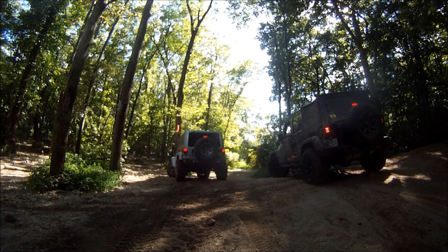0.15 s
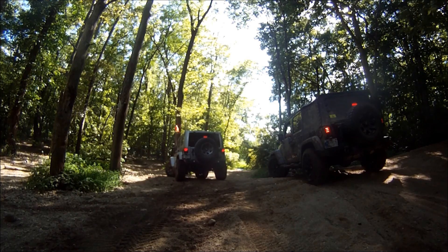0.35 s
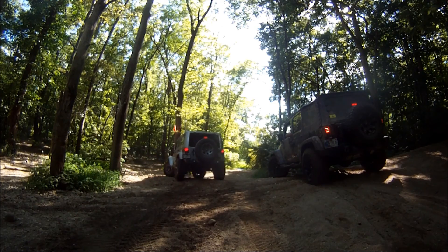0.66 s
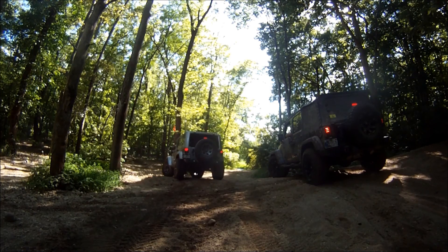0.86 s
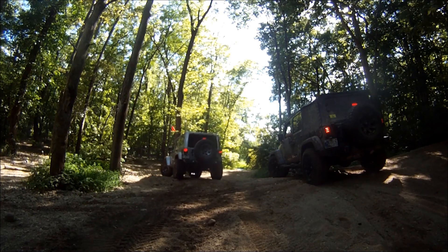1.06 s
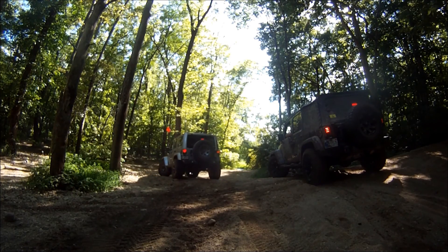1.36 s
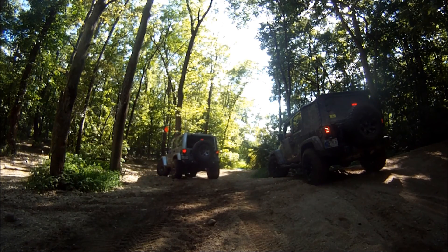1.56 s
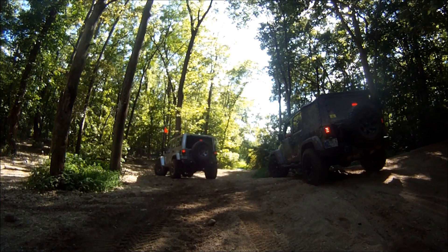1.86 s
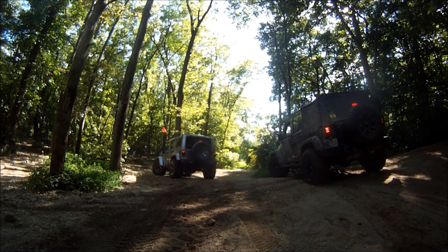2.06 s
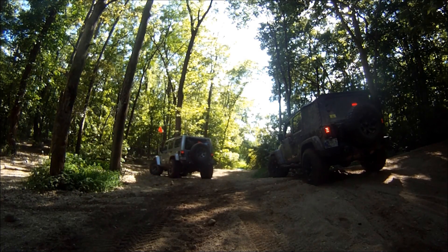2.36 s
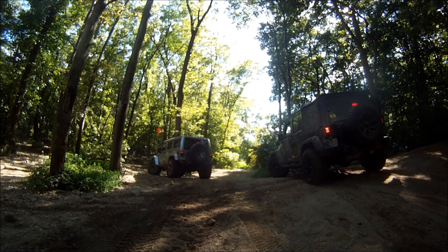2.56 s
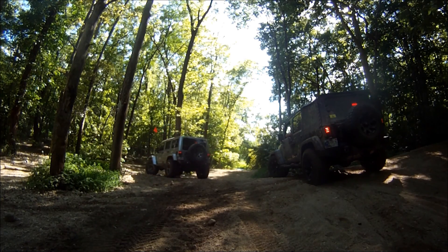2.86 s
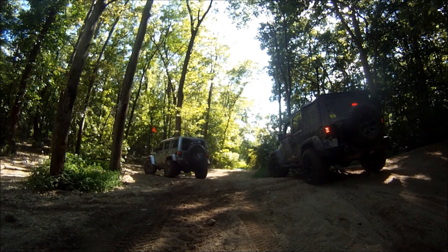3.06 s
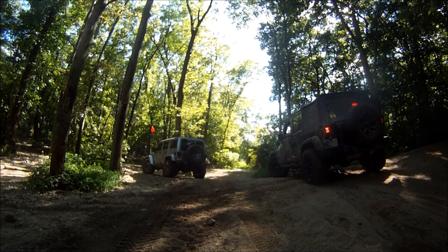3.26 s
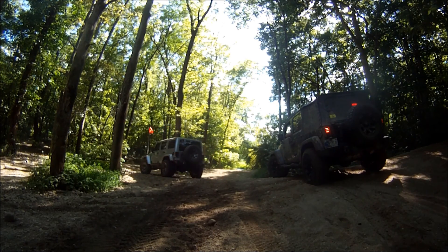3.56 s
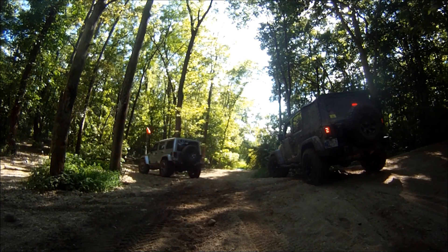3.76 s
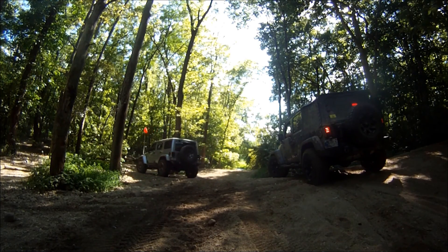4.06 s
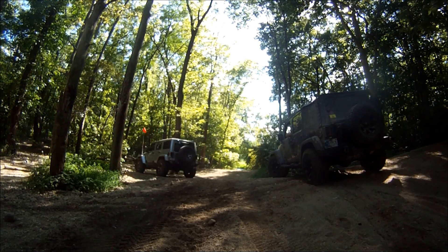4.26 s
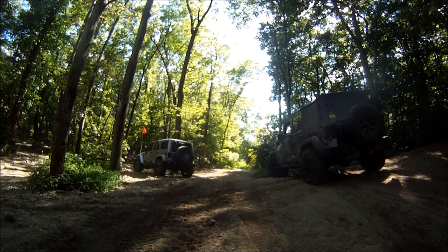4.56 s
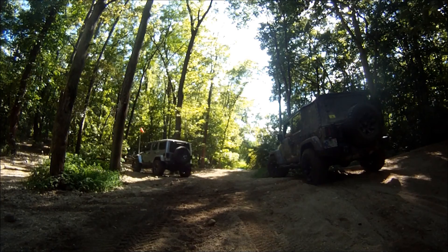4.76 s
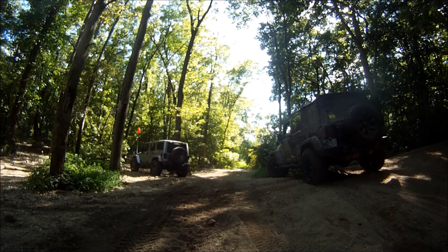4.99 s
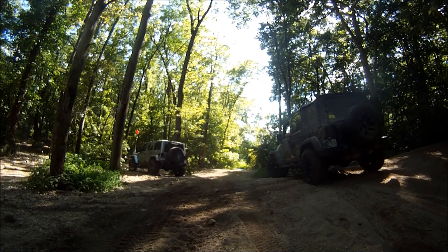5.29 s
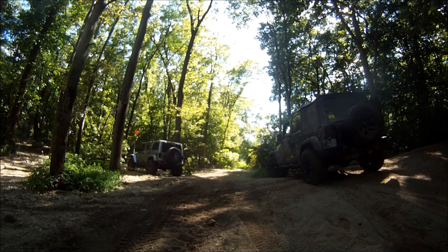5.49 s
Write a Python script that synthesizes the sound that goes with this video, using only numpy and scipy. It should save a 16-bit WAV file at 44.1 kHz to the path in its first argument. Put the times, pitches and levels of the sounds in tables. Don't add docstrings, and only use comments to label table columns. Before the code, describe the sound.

Close, muffled engine idle carried through the bodywork: deep hum, throbbing mid-range mechanical noise and a thin whine-like ring from the camera case. Fast little ticks run constantly with a coarse low-fidelity edge. Irregular low booms and soft thuds interrupt, strongest around 0.85, 3 and 3.65 seconds, with short clattering trim. No audible forest ambience.

```python
import sys
import numpy as np
from scipy import signal
from scipy.fft import rfft, irfft, next_fast_len
from scipy.io import wavfile
from scipy.ndimage import uniform_filter1d

SR = 44100
rng = np.random.default_rng(int(sys.argv[2]) if len(sys.argv) > 2 else 0)


def to_wav(sig):
    pcm = np.clip(np.atleast_2d(sig), -1, 1) * 32767
    pcm = np.round(pcm).astype(np.int16)
    wavfile.write(sys.argv[1], SR, pcm.T)


def voltage_ratio(decibels):
    exponent = np.asarray(decibels, float) / 20
    return 10 ** exponent


N = 248283
T = np.arange(N) / SR
CYLINDERS = 6
TICK_S = 0.00036


def walk(rate):
    hold = int(SR / rate)
    steps = np.repeat(rng.standard_normal(N // hold + 1), hold)
    return 1.315 * uniform_filter1d(uniform_filter1d(steps, hold), hold)[:N]


def curve(table):
    s, *columns = np.transpose(table)
    return [np.interp(T, s, column) for column in columns]


def coloured(gain_of_hz):
    size = next_fast_len(N)
    hz = np.arange(1, size // 2 + 2) * SR / size
    spectrum = rfft(rng.standard_normal(size)) * gain_of_hz(hz)
    return irfft(spectrum * np.sqrt(SR / 2), size)[:N]


def ringing(modes, steep, flicker_db):
    out = 0
    for mode_hz, width_hz, db in modes:
        band = coloured(lambda hz: voltage_ratio(db) / (1 + (2 * (hz - mode_hz) / width_hz) ** 2) ** steep)
        out = out + band * voltage_ratio(flicker_db * walk(8.3))
    return out


def clicks(s, db, hz, sharp_s):
    out = np.zeros(N + 500)
    t = np.arange(-100, 400)[:, None] / SR
    hit = np.exp(-(t / (sharp_s * np.where(t < 0, 1, 1.3))) ** 2)
    rough = np.cos(2 * np.pi * 0.06 * hz * t)
    after = voltage_ratio(-8.0) * (t > 0) * np.exp(-t / 0.0066) * rough
    click = voltage_ratio(db) * (hit + after) * np.sin(2 * np.pi * hz * t)
    places = ((s + TICK_S) * SR).astype(int) + np.arange(len(t))[:, None]
    np.add.at(out, places, click)
    return out[100:N + 100]


def crankshaft():
    firing_hz = 38.84 * (1 + 0.0011 * walk(1.5))
    return np.cumsum(firing_hz) / SR - 0.08


def panel_swing():
    # start_s, length_s, level_db, fade_db (over the swing)
    swings = [(0.02, 0.23, -30, -7), (0.24, 0.095, -28.5, -4), (0.362, .12, -32.5, -2.5),
              (0.837, 0.12, -19, -4), (0.959, 0.085, -24.5, -1), (1.046, 0.14, -31.5, 3),
              (1.223, 0.13, -28.5, -5), (1.362, 0.35, -33.5, -3), (1.742, 0.091, -29.5, -1.5),
              (1.85, 0.093, -30.5, 0.5), (1.949, 0.16, -31, -2), (2.176, 0.075, -33.5, 6.5),
              (2.365, .14, -34.5, -1.5), (2.569, 0.05, -29.5, 0), (2.675, 0.1, -29.5, -9),
              (2.788, .095, -30, 3.5), (2.968, .095, -20, 1), (3.032, 0.15, -23, -7.5),
              (3.19, 0.17, -34, 1.5), (3.412, 0.12, -33, -3), (3.628, 0.11, -22.5, 4),
              (3.743, 0.13, -34.5, 2.5), (3.903, 0.063, -31, 0.5), (3.982, .2, -32.5, -2.5),
              (4.255, 0.07, -28.5, -3), (4.341, 0.18, -32, -5.5), (4.495, 0.091, -22.5, 3),
              (4.598, 0.32, -27, -4), (5.24, 0.074, -33, 3), (5.394, 0.31, -38, 3.5)]
    attack_s, release_s, rest_db = 0.031, 0.033, -40
    power = voltage_ratio(2 * rest_db)
    for s, length, db, fade_db in swings:
        gate = np.clip(np.minimum((T - s) / attack_s, (s + length - T) / release_s), 0, 1)
        level = voltage_ratio(db + fade_db * np.clip((T - s) / length, 0, 1))
        power = power + (np.sin(np.pi / 2 * gate) ** 2 * level) ** 2
    return 10 * np.log10(power)


def engine_noise(crank, swing_db):
    # pitch_hz, width_hz, peak_db (per Hz)
    shell_modes = [(50.5, 3.4, -50.5), (77.7, 28, -60.5), (121.7, 8.1, -66), (145.5, 28, -66),
                   (157.6, 15.5, -66.5), (214.2, 12, -62.5), (235.6, 23.4, -59.5), (285, 37, -67),
                   (318.4, 21, -65.5), (340.5, 24, -69.5), (371.6, 25, -74)]
    # pitch_hz, width_hz, peak_db (per Hz)
    block_modes = [(510, 102, -82.5), (617, 76, -84), (785, 79, -76.5), (858, 53, -74), (910, 64, -81),
                   (977, 35, -82.5), (1079.7, 54, -67.5), (1141, 50, -68.5), (1230, 136, -70.5),
                   (1359, 41.4, -68.5), (1457, 25, -81.5)]
    # pitch_hz, width_hz, peak_db (per Hz)
    case_modes = [(1660, 45, -84), (1930, 60, -85.5), (2177, 246, -80.5), (2375, 150, -79.5),
                  (2517, 123, -83.5), (2690, 230, -84), (2804, 34, -70.5), (2859.6, 51.7, -68.5),
                  (3490, 510, -95), (3837, 380, -94), (4290, 270, -101)]
    # pitch_hz, level_db (per Hz)
    hiss_colour = [(18, -93), (40, -59), (182, -85), (300, -74.5), (450, -87.5), (1500, -88), (4600, -108),
                   (5650, -104)]
    # time_s, level_db
    effort = [
        (0, 1),
        (.9, -1),
        (1.5, 0),
        (3, 0),
        (3.45, -2),
        (3.65, 0),
        (4.9, 1),
        (5.63, 1),
    ]
    throb = np.cos(2 * np.pi * crank)
    hz, db = np.transpose(hiss_colour)
    hiss = coloured(lambda f: voltage_ratio(np.interp(np.log(f), np.log(hz), db) - (f > 6000) * 60))
    shell = voltage_ratio(0.73 * throb) * ringing(shell_modes, steep=1.15, flicker_db=0.5)
    block = voltage_ratio(0.28 * throb) * ringing(block_modes, steep=1.0, flicker_db=0.18)
    case = voltage_ratio(0.1 * throb) * ringing(case_modes, steep=1.055, flicker_db=-0.16)

    wander_per_s = 7
    block_db = curve(effort)[0] + 0.98 * walk(wander_per_s)
    shaking_db = np.maximum(swing_db + 26, 0)
    shell_db = 0.25 * shaking_db + 1.2 * walk(wander_per_s) - 0.6
    case_db = -0.28 * block_db + 0.12 * shaking_db + 0.3 * walk(wander_per_s)
    resonances = voltage_ratio(shell_db) * shell + voltage_ratio(block_db) * block + voltage_ratio(case_db) * case
    return resonances + voltage_ratio(0.79 * throb) * hiss


def injector_ticks(crank):
    open_db = [0, 1, -2, 1, -2, 1]
    close_db = [-8, -8, -7, -5, -8, -9]
    # time_s, level_db
    ticking = [
        (0.0, -69),
        (5.63, -70),
    ]
    firing = np.arange(1, int(crank[-1]))
    chance = rng.uniform(-1.7, 1.7, (len(firing), 6)).T
    out = 0
    for lag, pattern_db, (early, size, pitch) in ((0, open_db, chance[:3]), (0.53, close_db, chance[3:])):
        s = np.interp(firing + lag + 0.023 * early, crank, T)
        db = np.array(pattern_db)[firing % CYLINDERS] + 1.8 * size
        out = out + clicks(s, db, 4560 + 130 * pitch, TICK_S)
    return voltage_ratio(curve(ticking)[0] + 16.5) * out


def trim_slaps():
    # time_s, peak_db, pitch_hz
    slaps = [(0.0004, -42, 4350), (0.8415, -49, 4640), (0.8514, -50, 4500), (0.8565, -45, 4600),
             (0.8703, -44, 4500), (0.886, -51, 4600), (0.9022, -52, 4500), (0.9198, -52, 4380),
             (0.945, -53, 4700), (0.9564, -51, 4570), (2.963, -55, 4430), (3.0036, -53, 4310),
             (3.0144, -52, 4430), (3.0264, -50, 4440), (3.0914, -50, 4320), (3.1425, -55.5, 4970),
             (3.1791, -50, 4290), (3.6725, -49, 4545), (3.72, -51, 4540), (3.7505, -50, 4500),
             (3.7648, -47, 4370)]
    s, db, hz = np.transpose(slaps)
    return clicks(s, db, hz, sharp_s=0.00027)


def chassis_jolts():
    # time_s, peak_db, pitch_hz, t60_s
    knocks = [(0.217, -28, 219, 0.11), (0.845, -21.5, 236.5, 0.11), (1.181, -30, 227, 0.1),
              (1.338, -20.5, 244, 0.053), (1.7, -36, 229, 0.12), (2.109, -24.5, 243, 0.074),
              (2.42, -33, 217.6, 0.095), (2.548, -24, 220.2, 0.13), (2.972, -17, 236.3, 0.1),
              (3.028, -25, 229, 0.097), (3.607, -25, 239, 0.12), (3.66, -26, 289, 0.14),
              (3.69, -21, 223, 0.11), (4.51, -28, 232, 0.14), (4.658, -52, 222.3, 0.13)]
    out = np.zeros(N + SR)
    t = np.arange(SR // 2) / SR
    for s, db, hz, t60 in knocks:
        start = int(s * SR)
        low = np.sin(2 * np.pi * hz * t)
        high = voltage_ratio(-10.5) * np.sin(2 * np.pi * 312 * t) * t / 0.03
        envelope = (1 - np.exp(-t / 0.0054)) * 1000 ** (-t / t60)
        out[start:start + len(t)] += voltage_ratio(db - 2.0) * envelope * (low + high)
    return out[:N]


def panel_boom(swing_db):
    # time_s, pitch_hz
    rest_pitch = [(0, 73.5), (.6, 71.8), (1.05, 68.8), (1.3, 69.9), (1.45, 64.3), (1.75, 70.5), (2.1, 69.2),
                  (2.4, 64.5), (2.8, 71.23), (3.5, 68.5), (4.1, 66.5), (4.3, 69.1), (4.75, 67.13),
                  (5.63, 68.75)]
    sag_hz, sag_lag_s = 45.13, 0.034
    keep = np.exp(-1 / (sag_lag_s * SR))
    late_swing = signal.lfilter([1 - keep], [1, -keep], voltage_ratio(swing_db))
    hz = curve(rest_pitch)[0] - sag_hz * late_swing
    shaken = np.clip((-22.5 - swing_db) / 8, 0.15, 1)
    turn = np.cumsum(hz * (1 + 0.0317 * shaken * walk(20))) / SR
    level = voltage_ratio(swing_db + 0.76 * shaken * walk(16))
    return np.sqrt(2) * level * np.sin(2 * np.pi * turn)


def engine_hum(crank):
    # order (multiple of the six-firing cycle), level_db (rms)
    orders = [(4, -70), (6, -46), (7, -59), (18, -47), (19, -52), (24, -57), (26, -52), (30, -59.5),
              (33, -46.5), (36, -55), (39, -55), (42, -61.5), (48, -55.5)]
    out = 0
    for order, db in orders:
        swell = voltage_ratio(db + 1.2 * walk(5.0))
        turn = order * crank / CYLINDERS + rng.random()
        out = out + np.sqrt(2) * swell * np.sin(2 * np.pi * turn)
    return out


def scene():
    crank = crankshaft()
    swing_db = panel_swing()
    noise = engine_noise(crank, swing_db)
    metal = injector_ticks(crank) + trim_slaps() + chassis_jolts()
    tones = panel_boom(swing_db) + engine_hum(crank)
    return (noise + metal + tones)[None]


def top_cut(x):
    return signal.sosfilt(signal.butter(12, 15400, fs=SR, output="sos"), x)


def record(dry):
    guard_db = np.interp(np.arange(N // 2 + 1) * SR / N, [5650, 5720, 5880], [0, -4, -8])
    smooth = irfft(rfft(dry) * voltage_ratio(guard_db), N)
    lowpass = signal.firwin(14701, 1.03 / 147)
    slow = signal.resample_poly(smooth, 40, 147, axis=1, window=lowpass)
    stairs = np.repeat(slow, 4, axis=1)
    held = signal.resample_poly(stairs, 147, 160, axis=1)[:, :N]
    return top_cut(held)


dry = scene()
out = record(dry)
to_wav(out)
```